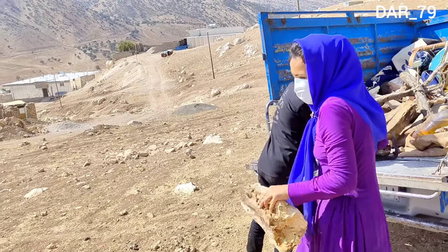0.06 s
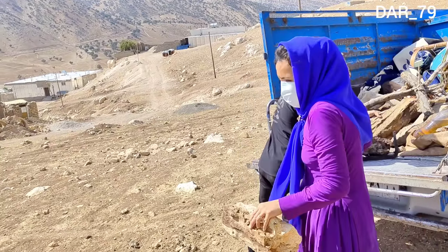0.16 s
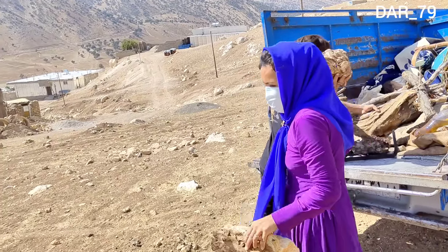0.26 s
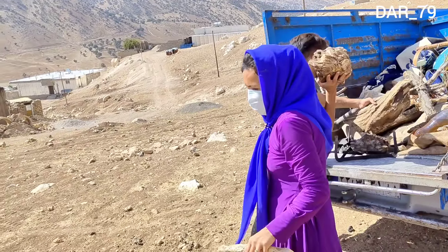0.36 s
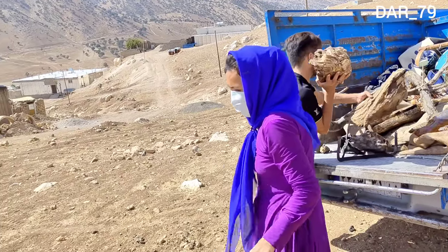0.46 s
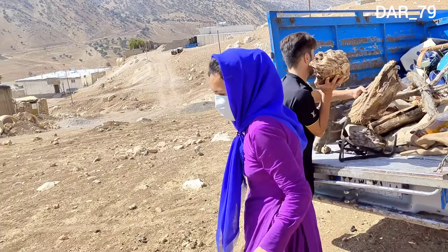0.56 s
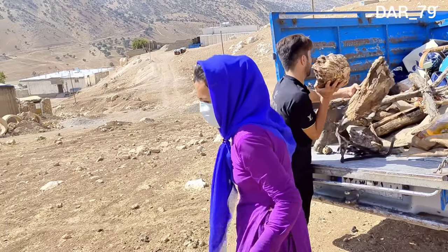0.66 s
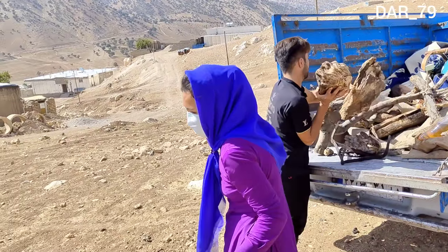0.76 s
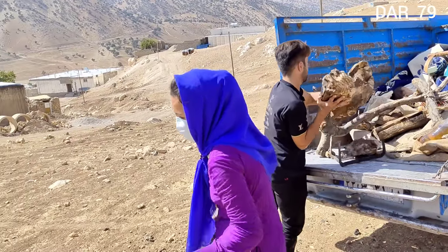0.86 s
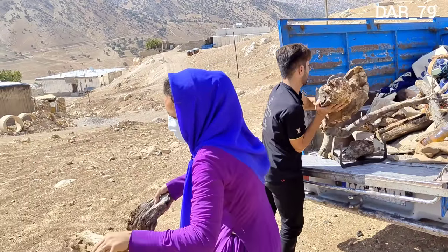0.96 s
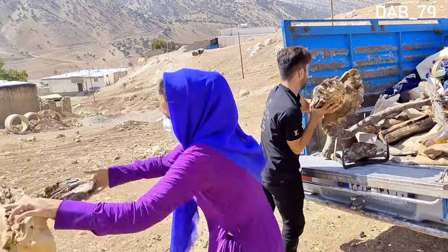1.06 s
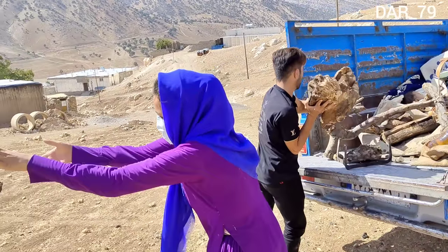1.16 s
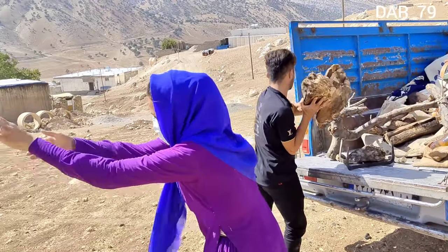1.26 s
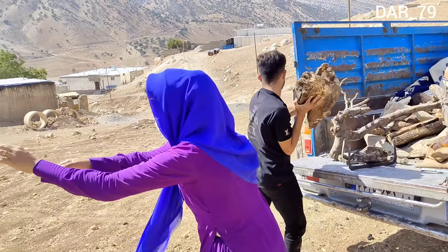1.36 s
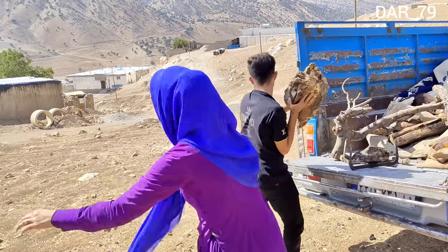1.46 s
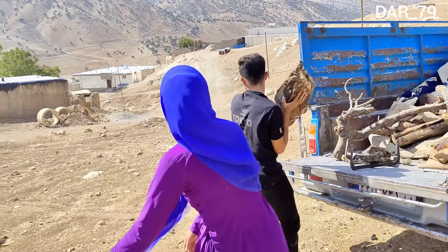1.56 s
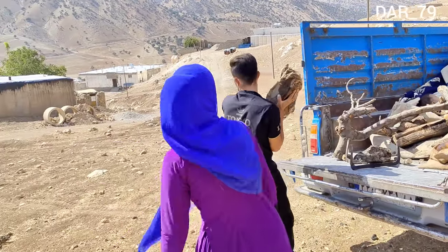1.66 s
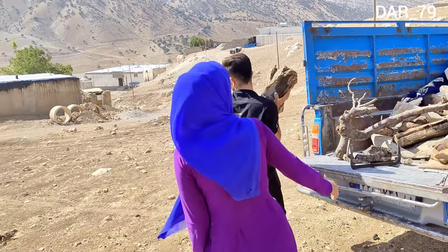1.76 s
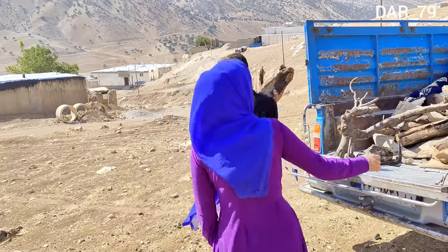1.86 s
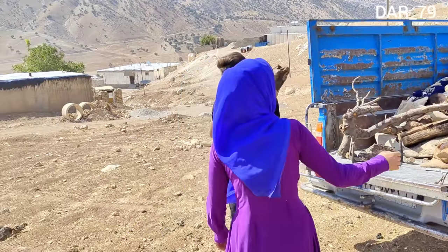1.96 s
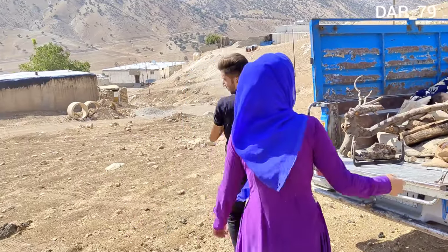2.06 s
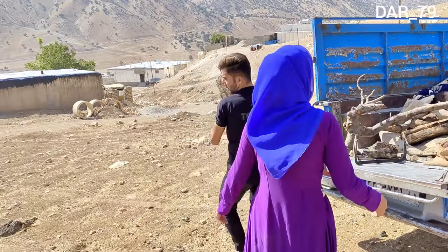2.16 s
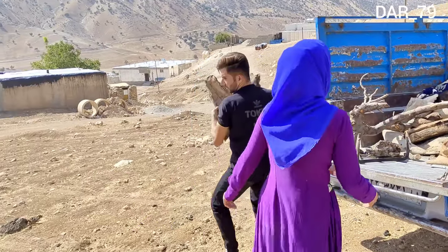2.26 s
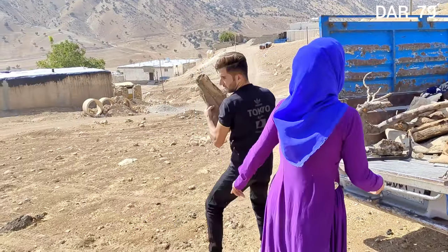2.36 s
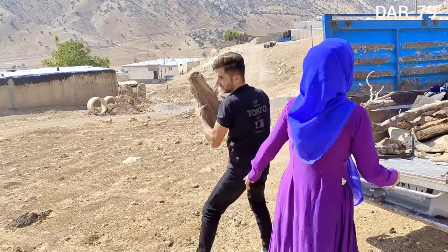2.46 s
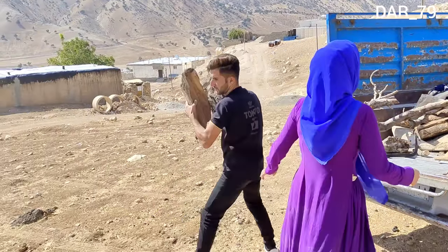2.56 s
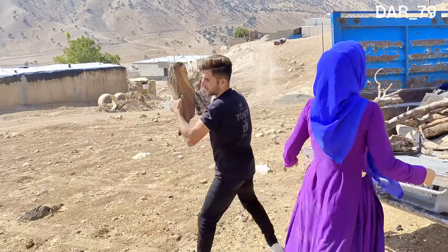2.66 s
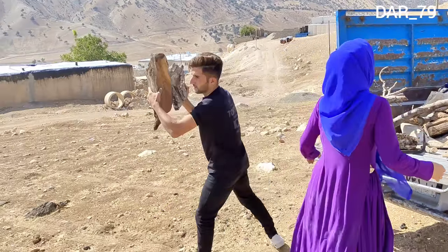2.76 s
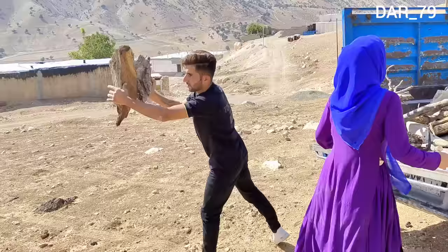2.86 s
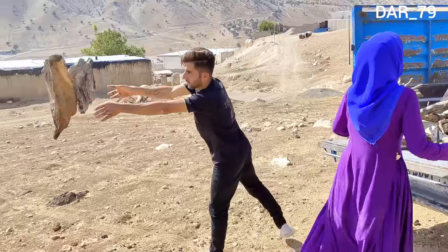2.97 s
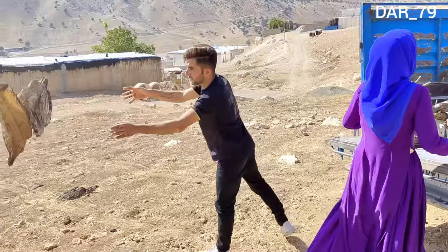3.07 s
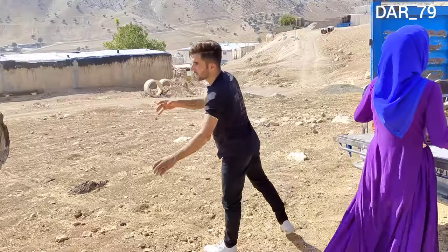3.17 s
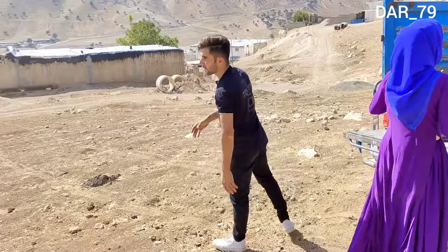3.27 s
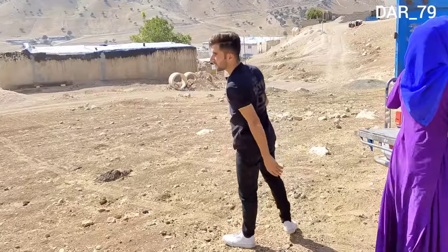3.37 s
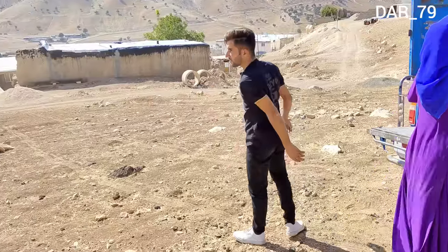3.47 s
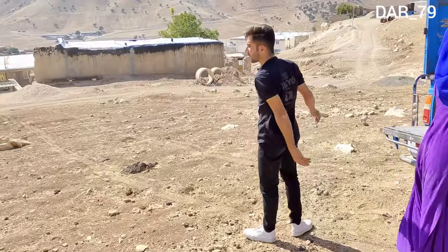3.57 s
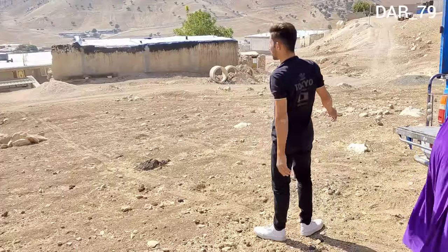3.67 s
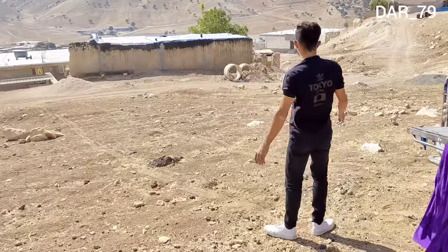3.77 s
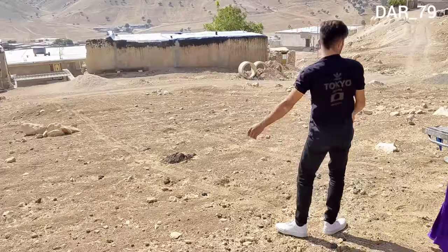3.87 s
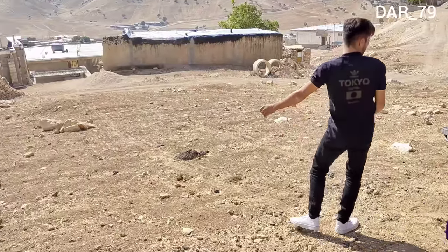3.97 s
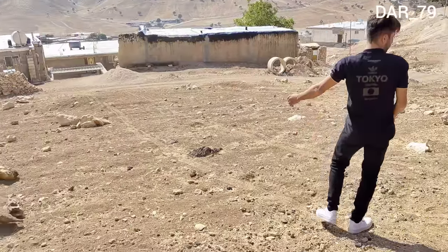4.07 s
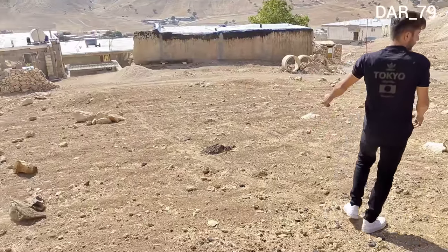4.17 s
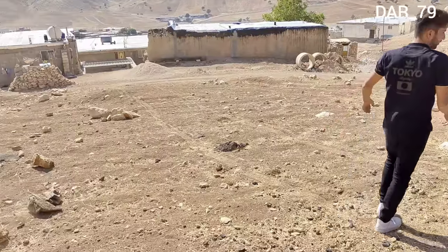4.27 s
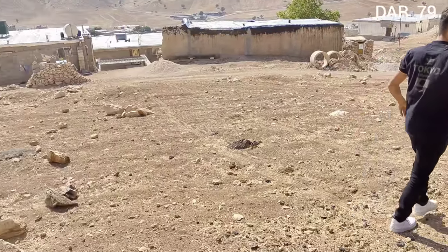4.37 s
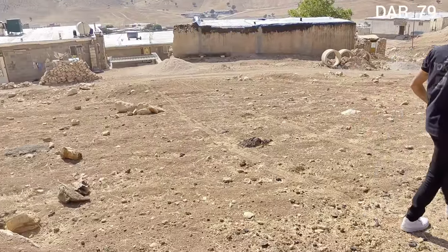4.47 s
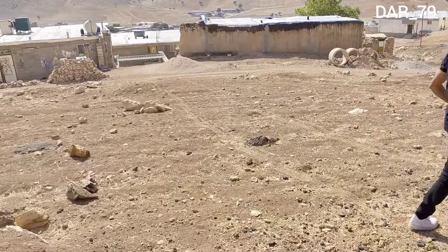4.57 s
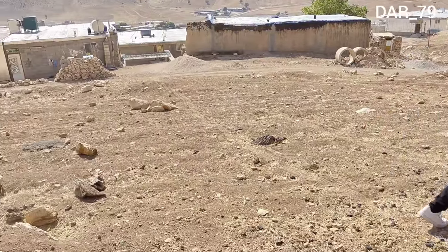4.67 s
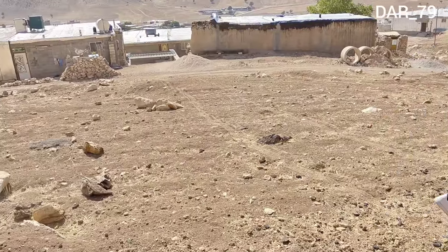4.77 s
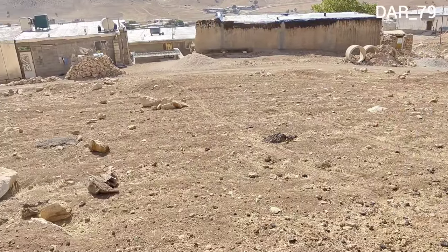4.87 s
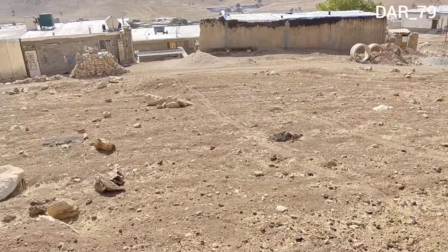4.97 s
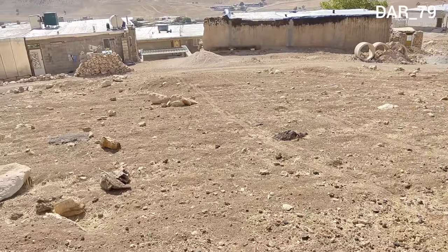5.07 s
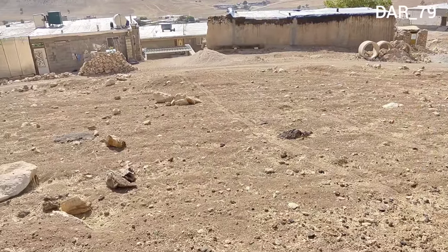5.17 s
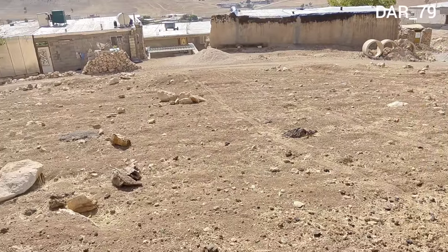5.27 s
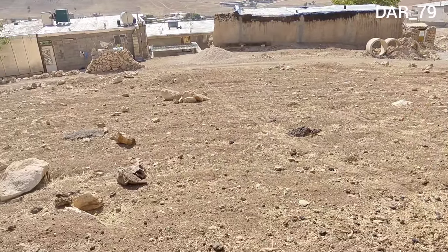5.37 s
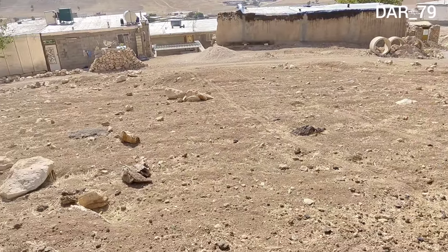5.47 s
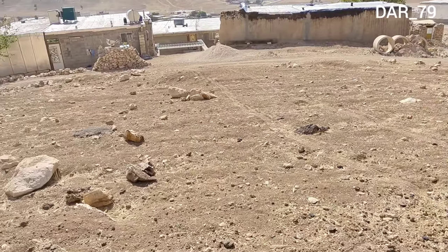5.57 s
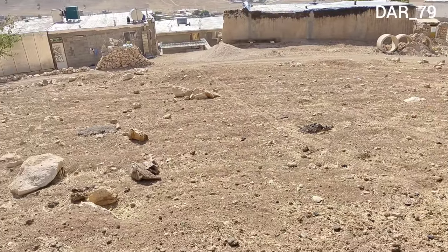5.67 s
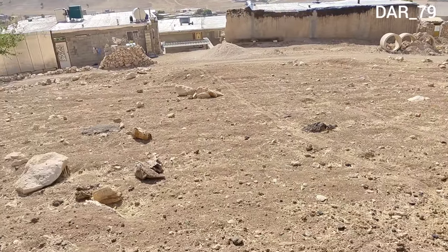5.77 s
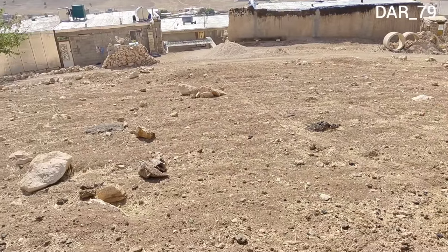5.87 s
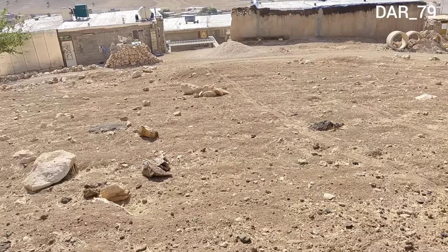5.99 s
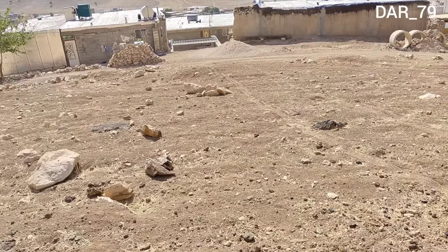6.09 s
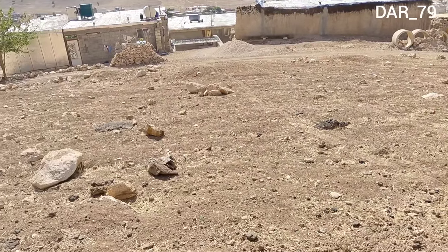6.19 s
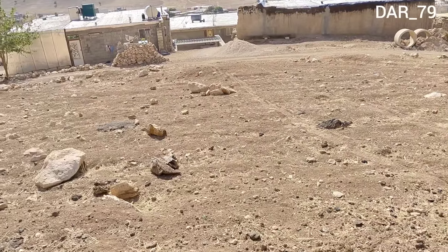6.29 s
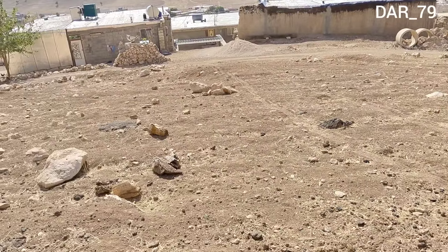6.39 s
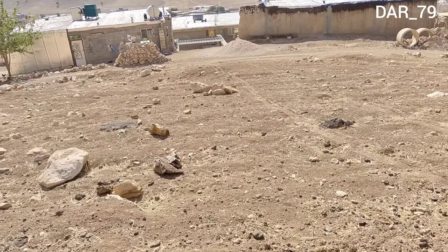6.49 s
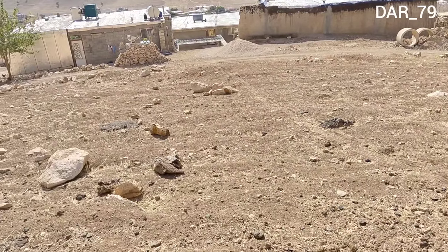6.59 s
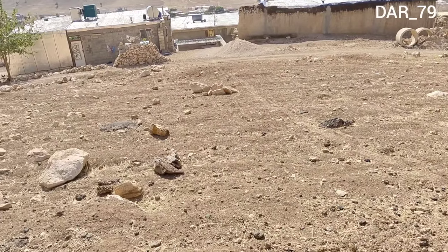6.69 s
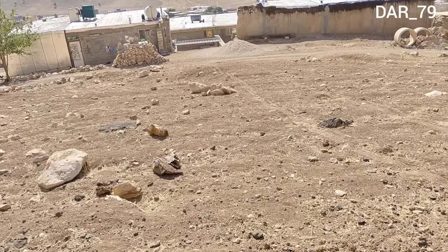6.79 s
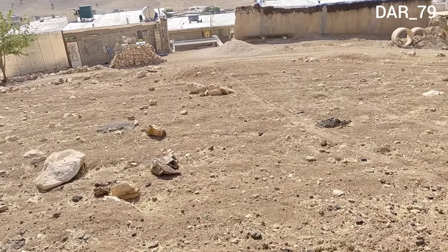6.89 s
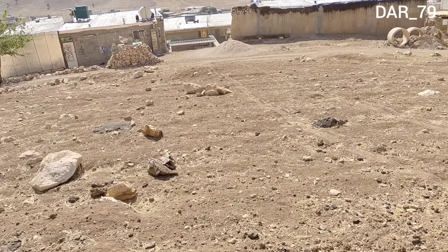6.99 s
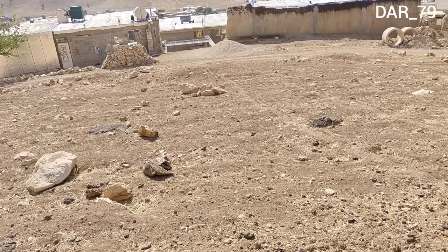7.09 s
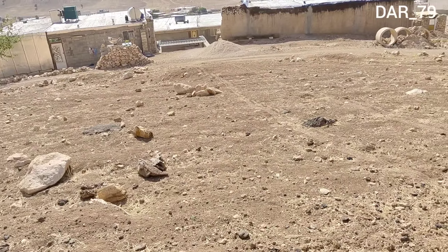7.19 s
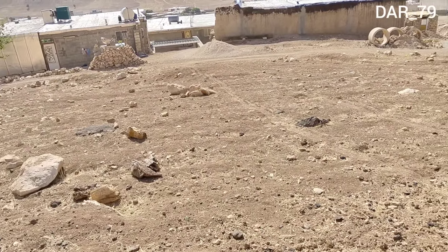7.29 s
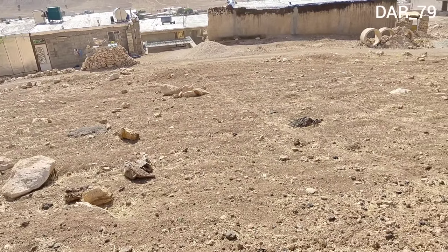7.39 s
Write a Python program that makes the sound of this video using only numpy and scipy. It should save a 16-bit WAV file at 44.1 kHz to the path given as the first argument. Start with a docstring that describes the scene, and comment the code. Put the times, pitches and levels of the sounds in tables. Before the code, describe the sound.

Logs drag and clatter on a rattling steel truck bed, hard wooden knocks hit dry ground, and wind puffs the microphone.

```python
"""Firewood thrown off a truck

Firewood is dragged off the steel bed of a small truck and thrown onto stony ground, near a turning camera.
Dragging and blows shape noise through panel, log and rail resonances; blows also ring decaying panel modes.
Knocks join a damped low push, log modes and a noise crack; thrown logs land on the left.
Wind is coloured noise with single pops, separate at the two ports; a faint coloured hiss lies under it all."""
import sys
import numpy as np
from scipy import signal
from scipy.fft import rfft, irfft
from scipy.io import wavfile
from scipy.ndimage import uniform_filter1d, map_coordinates

SR = 44100
rng = np.random.default_rng(int(sys.argv[2]) if len(sys.argv) > 2 else 0)


def to_wav(sig):
    """Store sig (one row per channel, or 1-D mono) as 16-bit WAV at the path in sys.argv[1].

    Samples outside -1..1 are clipped; the rate is SR.
    """
    pcm = np.clip(np.atleast_2d(sig), -1, 1) * 32767
    pcm = np.round(pcm).astype(np.int16)
    wavfile.write(sys.argv[1], SR, pcm.T)  # frames by channels


N = 328104

# Bearing of the truck as the camera turns away. Each row: time in seconds, lead of the right port in ms.
TRUCK_LEAD = [(0, 0.14), (3, 0.16), (4.8, 0.26), (6, 0.4), (6.7, 0.39), (7, 0.42)]


def gain_of(db):
    """Decibels to amplitude."""
    return 10 ** (np.asarray(db) / 20)


def evened(x):
    """Scales to rms 1."""
    return x / np.sqrt(np.mean(x ** 2) + 1e-20)


def read(points, hz):
    """Reads a spectrum on a log-frequency axis."""
    f, value = np.transpose(points)
    return np.interp(np.log(hz + 1), np.log(f + 1), value)


def curve(rows, column):
    """One column of a table, sample by sample."""
    rows = np.array(rows)
    return np.interp(np.arange(N) / SR, rows[:, 0], rows[:, column])


def coloured(x, points):
    """Applies a spectrum in dB to the last axis."""
    size = x.shape[-1]
    gain = gain_of(read(points, np.fft.rfftfreq(size, 1 / SR)))
    return irfft(rfft(x) * gain, size)


def resonate(x, hz, width_hz):
    """A fixed one-pole complex resonance of about unit gain at its centre."""
    pole = np.exp((2j * np.pi * hz - np.pi * width_hz) / SR)
    return 2 * signal.lfilter([1 - abs(pole)], [1, -pole], x).real


def resonate_twice(x, hz, width_hz):
    """Two equal resonances in series, for steeper skirts."""
    return resonate(resonate(x, hz, width_hz), hz, width_hz)


def resonate_modes(noise, modes):
    """Noise through parallel modes of alternating sign, evened to rms 1."""
    total = 0
    for k, (hz, width_hz, db) in enumerate(modes):
        total = total + (-1) ** k * gain_of(db) * resonate(noise, hz, width_hz) / np.sqrt(width_hz)
    return evened(total)


def flutter(span_s, depth_db):
    """A gain that wanders at random, with rms 1."""
    size = round(span_s * SR)
    smooth = uniform_filter1d(uniform_filter1d(rng.standard_normal(N), size), size)
    return evened(gain_of(depth_db * evened(smooth)))


def add(mix, s, sound):
    """Mixes a sound in at a time."""
    part = mix[..., round(s * SR):][..., :sound.shape[-1]]
    part += sound[..., :part.shape[-1]]


def ports(direct, scattered, lead_ms):
    """The direct wave reaches one port first; the scattered part differs at each port."""
    shift = lead_ms * SR / 2000  # half the lead at each port, in samples
    at = np.arange(N) + np.array([-shift, shift]).reshape(2, -1)
    return map_coordinates(direct, [at], order=3) + scattered


def scrapes():
    """Rumble and rasp levels of dragging and scuffing: each scrape swells, holds and dies away."""
    # Logs dragged over the bed and shoes scuffing the dirt.
    # Each row: start in seconds, length in seconds, rumble level in dB, rasp level in dB.
    scrape_rows = [(-0.1, 0.29, -61, -50.5), (0.217, 0.23, -46.5, -51.5), (0.416, 0.26, -48.5, -49.5),
                   (0.614, 0.2, -41.5, -50), (1.028, 0.23, -50, -57), (1.523, 0.13, -68, -60.5),
                   (1.697, 0.14, -70, -65), (1.905, 0.11, -61.5, -58), (2.327, 0.13, -69, -64.5),
                   (2.54, 0.19, -58, -65.5), (2.824, 0.14, -57.5, -53.5), (2.99, 0.24, -59, -63.5),
                   (3.296, 0.32, -63, -60), (3.596, 0.16, -60, -58.5), (4.012, 0.062, -64, -63.5),
                   (4.14, 0.14, -75, -66), (4.501, .18, -59.5, -72.5), (4.699, 0.11, -46.5, -60.5),
                   (4.85, 0.21, -46, -61.5), (5.408, 0.13, -56, -62.5), (5.542, 0.15, -55, -76),
                   (5.976, 0.15, -52, -63), (6.202, 0.038, -54, -62.5), (6.6, 0.16, -49, -69.5),
                   (6.945, 0.11, -54.5, -57.5), (7.07, 0.15, -56.5, -66.5), (7.259, 0.094, -55, -85.5)]
    rise_share, t60_s = 0.8, 0.48  # share of the length spent swelling; decay after the length
    stir_db = np.array([-73, -73])  # the load never lies quite still: rumble, rasp
    level = gain_of(stir_db)[:, None] * np.ones(N)
    for s, length_s, rumble_db, rasp_db in scrape_rows:
        t = np.maximum(np.arange(N) / SR - s, 0)
        swell = np.sin(np.pi / 2 * np.minimum(t / (rise_share * length_s), 1)) ** 2
        decay = gain_of(-60 * np.maximum(t - length_s, 0) / t60_s)
        level += gain_of([[rumble_db], [rasp_db]]) * swell * decay
    return level


def patchy(x, depth_db):
    """Different pieces rattle in turn: random patches of pitch and time swell and fade."""
    z = signal.stft(x, nperseg=256, noverlap=192)[2]
    patches = uniform_filter1d(rng.standard_normal(z.shape[1:]), size=4, axis=0)
    patches = evened(uniform_filter1d(patches, size=16, axis=1))
    return signal.istft(z * evened(gain_of(depth_db * patches)), nperseg=256, noverlap=192)[1][:, :N]


def bed():
    """Dragging and blows shake the panel modes; logs knock, loose bark rasps and the rails clatter above them."""
    # Blows on the truck bed and the uneven rattling that follows them.
    # Each row: time in seconds, rattle level in dB, boom level in dB,
    # wood knock level in dB, brightness in dB, rattle t60 in seconds.
    bangs = [(0.1563, -43.5, -29, -39, -1, 0.56), (0.177, -35, -23, -35, 0.5, 0.17),
             (0.8696, -26.5, -64, -39, -2, 0.14), (0.9198, -19.5, -23, -14, 9, 0.14),
             (0.9302, -19, -9.5, -32, -5.5, 0.39), (0.9534, -40.5, -31, -32, 18.5, 0.6),
             (1.0074, -29.5, -34, -32.5, 9.5, 0.19), (1.0324, -35, -33, -38, -15, 0.26),
             (1.124, -37, -54, -45.5, -14, 0.18), (1.271, -24, -17.5, -20, -1.5, 0.18),
             (1.2947, -39.5, -25, -45, -6, 0.46), (6.5925, -34, -28.5, -31.5, 1, 0.3),
             (6.6128, -45, -26.5, -28.5, -19, 0.29), (6.8199, -19, -7.5, -9, -5.5, 0.26),
             (6.843, -46, -16.5, -33.5, -24, 0.21), (6.8777, -40.5, -31, -40, 8.5, 0.3),
             (6.9571, -34, -19, -27.5, -9, 0.21), (7.118, -41.5, -34, -69, -28, 0.23)]
    # Bed panel modes. Each row: frequency in Hz, width in Hz, level in dB.
    panel_modes = [(133, 62, -4), (179, 31, 0.5), (212.3, 23, -2.5), (254.2, 12, -1.5), (304.5, 25, -0.5),
                   (429, 80, -4), (493, 15.3, -11.5), (548, 71, -7), (642, 13, -6.5), (800, 90, -10.5),
                   (921, 4.9, -14), (975, 48, -11), (1240, 450, -10), (1430, 60, -13.5)]
    # Heavy logs jolting together. Each row: frequency in Hz, width in Hz, level in dB.
    log_modes = [(704, 58, -1.5), (886, 120, 1), (1220, 200, 0), (1514, 320, -3), (2040, 1300, -11)]
    # Rail and rib modes. Each row: frequency in Hz, width in Hz, level in dB.
    rail_modes = [(1790, 55, -2.5), (2300, 39, -22.5), (2740, 13, -6.5), (2930, 140, -4), (3460, 40, -15.5),
                  (3700, 24, -2.5), (3956, 50, -3), (4510, 77, -2), (4990, 120, 3.5), (5300, 97, -7.5),
                  (5500, 40, -7), (6080, 48, -4), (6550, 90, -4), (7000, 35, 0.5), (7130, 70, 1),
                  (7800, 50, 0.5), (7670, 58, -1)]
    # Spectrum of rasping bark. Each row: frequency in Hz, level in dB.
    rasp_spectrum = [(700, -13.5), (1300, -0.5), (2000, 1.5), (2700, -3), (3600, -2.5), (5000, -6.5),
                     (8000, -7.5), (15000, -15.5)]

    t = np.arange(SR) / SR
    boom, rasp = scrapes()
    lead_ms = curve(TRUCK_LEAD, 1)
    facing = gain_of(-30 * (lead_ms - 0.1631))  # the treble fades as the camera turns its back
    knock, fizz, ring = 0.52 * boom, 0.68 * rasp * facing, np.zeros(N)
    sliding = np.array([rasp, fizz])  # copied before the blows are added

    hz, width_hz, mode_db = np.transpose(panel_modes)[..., None]
    for s, rattle_db, boom_db, knock_db, bright_db, t60_s in bangs:
        # dull, heavy blows reach the low modes
        weight = gain_of(mode_db) * (hz / 300) ** (bright_db / 30) * rng.uniform(0.48, 1, hz.shape)
        tones = np.sin(2 * np.pi * (hz * t + rng.random(hz.shape)))
        struck = (weight * np.exp(-np.pi * width_hz * t) * tones).sum(0) / np.linalg.norm(weight)
        add(ring, s, gain_of(boom_db - 3.5) * struck * (1 - np.exp(-t / 0.012)))

        fall = gain_of(-60 * (t / t60_s) ** 1.032)  # the jolted load rattles a while, then settles
        onset = 1 - np.exp(-t / 0.0016)
        add(boom, s - .002, gain_of(boom_db - 7.5) * (1 - np.exp(-t / 0.0062)) * fall ** 0.8)
        add(knock, s - .001, gain_of(knock_db - 3.5) * (1 - np.exp(-t / 0.00045)) * fall)
        add(rasp, s - .001, gain_of(rattle_db - 7.0) * onset * fall)
        add(fizz, s - .001, gain_of(rattle_db + bright_db - 3.0) * onset * fall ** 1.74)

    noise = rng.standard_normal((5, 3, N))  # middle axis: one direct and two scattered signals
    panel = resonate_modes(noise[0], panel_modes)
    logs = resonate_modes(noise[3], log_modes)

    # uneven small impacts strike the rails, which ring on; a slow slide hardly rings them
    drive = np.array([rasp, fizz]) - 0.7 * sliding
    clatter = noise[2] * drive[:, None] * flutter(0.007, 3.9)
    rails = 0
    for k, (f, w, db) in enumerate(rail_modes):
        source = clatter[int(f > 4200)]  # rasp below, fizz above
        rails = rails + 60 * (-1) ** k * gain_of(db) * resonate(source, f, w) / np.sqrt(w)

    bark = 0.98 * rasp * evened(coloured(noise[1], rasp_spectrum))
    bark = bark + 0.51 * fizz * evened(resonate_twice(noise[1], 6300, 5000))
    sizzle = 0.72 * fizz * facing * evened(resonate_twice(noise[4], 10000, 5000))
    low = 1.186 * boom * flutter(0.06, 2.7) * panel + knock * flutter(0.006, 3.4) * logs
    high = patchy(bark * flutter(0.015, 1.4) + rails + sizzle, depth_db=1.5)
    dull = signal.sosfilt(signal.butter(2, 3200, fs=SR, output="sos"), high)
    high = dull + facing ** .5 * (high - dull)

    # extra low boom near 135 Hz, mostly in the later blows
    extra = 1 - np.minimum(facing, 1)
    low = low + 0.7 * boom * extra * evened(resonate(noise[4], 135, 71))
    return ports(ring + low[0] + 0.41 * high[0], 0.1 * low[1:] + 1.144 * high[1:], lead_ms)


def wind():
    """Lumpy low turbulence, unrelated at the two ports, with single pops."""
    # Wind on the ports. Each row: time in seconds, relative level in dB.
    wind_level = [(0.0, -51), (0.25, -57), (0.54, -53.5), (0.76, -51.5), (1.1, -44), (1.9, -52), (2.6, -53),
                  (2.9, -66.5), (3.45, -54), (3.87, -66.5), (4.2, -62.5), (4.45, -65.5), (4.76, -52.5),
                  (5.53, -65), (6.07, -59), (6.55, -59.5), (7.02, -50), (7.44, -44)]
    # Wind noise shifts irregularly between the ports, mostly right early, mostly left late.
    # Each row: time in seconds, left-right difference in dB.
    wind_side = [(0, -6.5), (1.5, -7), (2.45, -12.5), (2.75, 2), (3.1, -13), (3.3, 7), (3.45, -5.5),
                 (4.2, -7), (4.55, 16), (5.3, -0.5), (6.3, 9.5), (7.44, 14.5)]
    # Spectrum of the turbulence. Each row: frequency in Hz, level in dB.
    gust_spectrum = [(20, -7.5), (45, -0.5), (100, 0), (170, -4), (260, -12), (450, -33.5), (900, -55)]
    # Gust pops, leaning to the port with more wind noise.
    # Each row: time in seconds, level in dB, frequency in Hz.
    pops = [(0.774, -25, 114), (0.809, -26.5, 167), (1.156, -26.5, 128), (1.589, -28, 179),
            (1.626, -31.5, 114), (1.903, -45, 156), (2.002, -38.5, 116), (2.049, -33, 152),
            (2.12, -44, 155), (2.375, -29.5, 215), (2.386, -22.5, 128), (2.432, -33.5, 109),
            (2.619, -36, 113), (2.721, -38.5, 243), (3.075, -38, 205), (3.174, -34.5, 135),
            (3.21, -33, 76.5), (3.25, -36.5, 144), (3.348, -38.5, 142), (3.437, -35, 156),
            (4.137, -35, 140), (4.285, -39, 233), (4.551, -50, 134), (4.628, -41, 83), (5.178, -35.5, 85.5),
            (6.379, -39, 112), (6.502, -43.5, 191), (7.185, -33.5, 187), (7.208, -29.5, 144),
            (7.309, -31, 221), (7.328, -21, 236.5), (7.337, -17.5, 186)]
    sway_db, sway_s = 8, .12  # random sway about the given side
    pop_cycles, pop_side = .8, 2.58  # cycles to the crest; lean relative to the wind's left-right dB

    lumps = np.array([flutter(0.027, 5.7), flutter(0.033, 4.3)])
    sway = sway_db * evened(uniform_filter1d(rng.standard_normal(N), size=round(sway_s * SR)))
    side_db = (curve(wind_side, 1) + sway) * np.array([[.5], [-.5]])
    turbulence = evened(coloured(rng.standard_normal((2, N)), gust_spectrum))
    out = turbulence * lumps * gain_of(curve(wind_level, 1) + side_db + 5.5)

    t = np.arange(2000) / SR
    for s, db, hz in pops:
        pan_db = pop_side * np.interp(s, *np.transpose(wind_side))
        u = t * hz / pop_cycles
        pop = u ** 2 * np.exp(2 - 2 * u) * np.cos(2 * np.pi * (hz * t - pop_cycles))
        pop = pop * (1 + 0.084 * pop)  # crests are sharper than troughs
        near = gain_of(np.minimum([[pan_db], [-pan_db]], 0))
        add(out, s - .002, gain_of(db) * 2 * near / near.sum() * pop)  # mean of both ports stays put
    return out


def hush():
    """Open-air hush and the microphone's own hiss, as one coloured noise."""
    # Hush spectrum. Each row: frequency in Hz, relative level in dB.
    hush_spectrum = [(100, -83.5), (300, -92), (700, -91), (2000, -91), (4500, -101), (7200, -98),
                     (15000, -99)]
    return gain_of(35.0) * coloured(rng.standard_normal((2, N)), hush_spectrum)


def knocks(rows, lead_ms):
    """A short low push, the ring of the log, and a crack of bark and grit."""
    # Log modes, detuned at each knock. Each row: frequency in Hz, level in dB, t60 in seconds.
    wood_modes = [(556.4, 2, 0.043), (769, 1.5, 0.033), (1076, 4.5, 0.024)]
    # Contact resonances. Each row: factor on the contact pitch, width in Hz, level in dB.
    contact_modes = [(.6, 700, -6), (1.0, 750, 10.5), (1.45, 1100, 2.5), (1.9, 1500, -8.5)]
    thud_hz, thud_top_hz = 220, 269  # pitch at a table level of -45.5 dB, rising with level; upper limit
    bite = 0.85  # the smaller, the more sudden the start of a crack

    direct, scattered, t = np.zeros(N), np.zeros((2, N)), np.arange(8000) / SR
    for s, crack_db, contact_hz, contact_ms, thud_db, ring_db, bright_db in rows:
        hz = min(thud_hz * gain_of(thud_db + 45.5), thud_top_hz)
        noise, detune = rng.standard_normal((3, len(t))), rng.uniform(0.86, 1.07)
        u = t * hz / 0.71
        thud = u ** 2 * np.exp(2 - 2 * u) * np.cos(2 * np.pi * hz * t - 1.5)

        ring = 0
        for f, db, t60_s in wood_modes:
            ring = ring + gain_of(db - 60 * t / t60_s) * np.sin(2 * np.pi * f * detune * t)
        ring = ring * (1 - np.exp(-t / 0.0038))

        tap = 0
        for factor, width_hz, db in contact_modes:
            tap = tap + gain_of(db) * resonate_twice(noise, factor * contact_hz, width_hz)
        tap = evened(tap)
        grit = evened(resonate(resonate(noise, 7200, 3600), 6800, 3600) + 0.8 * noise)
        grit = gain_of(bright_db) * grit

        # the contact swells and lets go; dust trails after it
        u = 1000 * t / contact_ms
        contact = (u * np.exp(1 - u / bite) / bite) ** bite
        dust = evened(resonate(noise[::-1], 2800, 3500) + .7 * grit)
        dust = (1 - np.exp(-u)) * gain_of(-18.0 - 60 * t / .16) * dust
        crack = gain_of(crack_db - 8.5) * ((tap + grit) * contact + dust)

        add(direct, s - .003, gain_of(thud_db + 2.5) * thud)
        add(direct, s - .0015, gain_of(ring_db + 6.5) * ring + crack[0])
        add(scattered, s - .0015, 1.54 * crack[1:])
    return ports(direct, scattered, lead_ms)


def scene():
    """All sources at the two ports; knocks in the throwing span come from the ground, the others from the pile."""
    # Logs knocking on the ground or in the pile. Each row: time in seconds, crack level in dB, contact
    # pitch in Hz, contact time in ms, thud level in dB, wood ring level in dB, grit brightness in dB.
    knock_rows = [(0.286, -38.5, 1470, 8.9, -49, -38, -21), (0.3826, -60, 1470, 2.2, -42, -37, -14),
                  (1.4355, -41.5, 1950, 1.9, -36.5, -56, -2.5), (1.5219, -49, 2788, 5.1, -45.5, -65, -7),
                  (1.8086, -22.5, 3080, 1.87, -13, -25, 0), (1.8332, -23.5, 2070, 2.3, -23.5, -52, -2.5),
                  (1.9443, -41, 2360, 3.6, -58, -70, 3), (1.959, -32, 1970, 2.5, -45, -73, -25),
                  (2.1494, -27.5, 1850, 1.13, -43, -55, -12), (2.1753, -47, 1710, 2.7, -56, -67, -5),
                  (2.204, -35.5, 1760, 2.8, -24.5, -26, -14.5), (2.2824, -39, 2050, 0.84, -39, -56, -2.5),
                  (2.289, -40.5, 2420, 2.7, -47, -63, -11), (2.4236, -50.5, 2060, 6.2, -46, -59, 4),
                  (2.5688, -37.5, 1810, 3.5, -45.5, -50, -17), (3.495, -35.5, 3970, 4.1, -46, -42.5, 10.5),
                  (3.5102, -26, 3680, 3.7, -22, -34, 7.5), (3.5214, -35.5, 2920, 4.5, -28, -49, 10),
                  (3.5328, -37.5, 2900, 7.1, -38.5, -38, 5.5), (3.592, -3, 2040, 1.2, -8, -11, -13.5),
                  (3.6224, -31, 1957, 2.6, -34, -30.5, 17), (3.657, -39, 3310, 4.1, -47.5, -42.5, -5),
                  (3.7235, -34.5, 1910, 1.5, -48, -69, -24), (3.7642, -58, 1700, 3.5, -45, -43.5, -5.5),
                  (3.8672, -51.5, 1940, 2.7, -49, -58, -6), (4.0102, -53, 3800, 2.8, -70, -56, 3),
                  (4.024, -40.5, 3500, 1, -58, -58, 8.5), (4.0312, -30, 3200, 2.1, -40.5, -34, 14.5),
                  (4.0465, -43, 3140, 1.9, -55.5, -35.5, 17), (4.2037, -51, 2580, 2.5, -75, -53.5, 1.5),
                  (4.2762, -45, 3570, 2.8, -59, -60.5, -5), (4.7509, -40, 1484, 1.8, -46, -52.5, -24),
                  (5.243, -59.5, 2106, 4.0, -44.5, -51, 0), (5.5698, -50.5, 1830, 2.96, -45, -71.5, -22),
                  (6.0331, -40.5, 2486, 3, -48.5, -48, -22.5), (6.05, -25.5, 2760, 2.7, -31, -25.5, -2),
                  (6.2283, -29.5, 2140, 5.7, -41.5, -34.5, -9.5), (6.336, -51, 1955, 3.2, -62, -76, -36.5),
                  (6.518, -54.5, 2075, 4.8, -47, -67.5, -18),
                  (6.6635, -43.5, 1900, 1.65, -55.5, -38.5, 15.5)]
    thrown_from_s, thrown_until_s = 1.7, 4.4
    ground_lead_ms = -0.346  # the left port hears it first
    landings = [row for row in knock_rows if thrown_from_s < row[0] < thrown_until_s]
    pile = [row for row in knock_rows if row not in landings]
    knocking = knocks(landings, ground_lead_ms) + knocks(pile, curve(TRUCK_LEAD, 1))
    return bed() + wind() + hush() + knocking


def record(dry):
    """Tone colour of the whole sound, a soft overload, then the band limit."""
    # The right port faces the scene and hears more treble. Each row: frequency in Hz, gain in dB.
    right_port = [(1500, -0.5), (4000, 2.5), (12000, 2.5)]
    # Tone colour of the whole sound: a step down above 8 kHz, little above 14 kHz.
    # Each row: frequency in Hz, gain in dB.
    tone_colour = [(60, -1.5), (200, 2), (6000, -4.5), (7500, -2.5), (8050, -8.5), (8500, -18),
                   (11500, -11), (14000, -10), (14500, -34)]
    overload, edge_hz = 1.05, 15650  # amplitude ceiling; band limit
    heard = coloured(np.array([dry[0], coloured(dry[1], right_port)]), tone_colour)
    heard = heard / (1 + (heard / overload) ** 4) ** .25
    band = signal.firwin(511, edge_hz, window=("kaiser", 9), fs=SR)
    return signal.oaconvolve(heard, band[None], "same")


dry = scene()
out = record(dry)
to_wav(out)
```